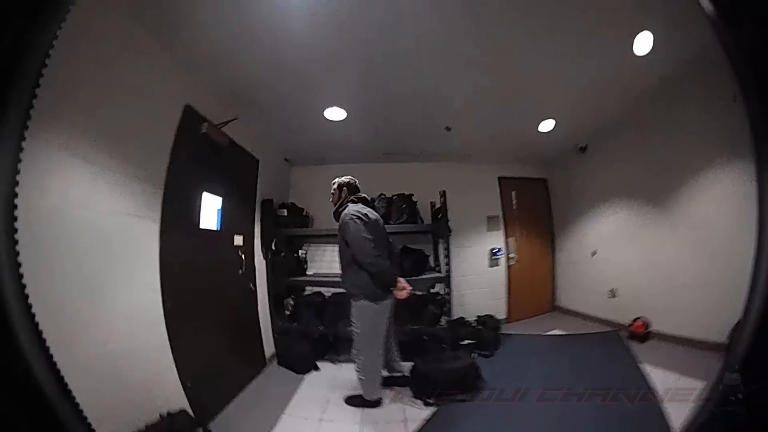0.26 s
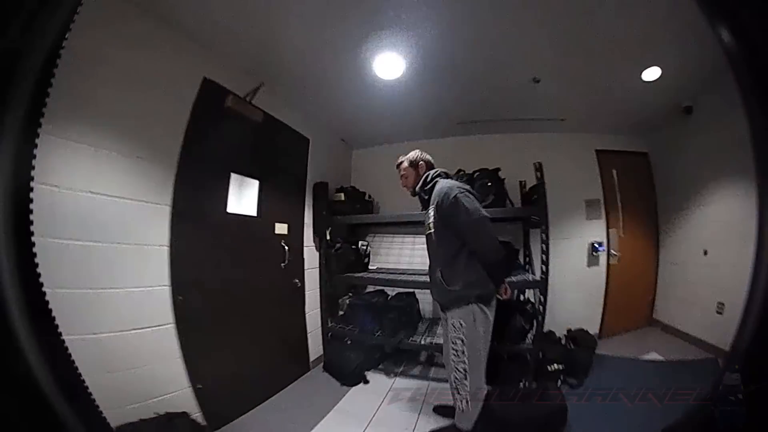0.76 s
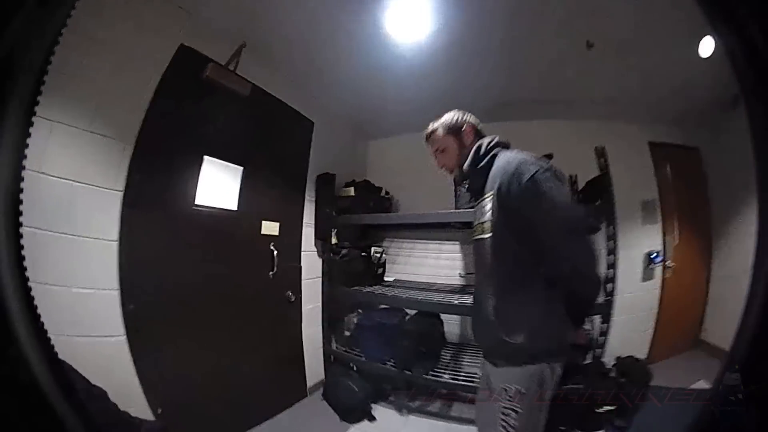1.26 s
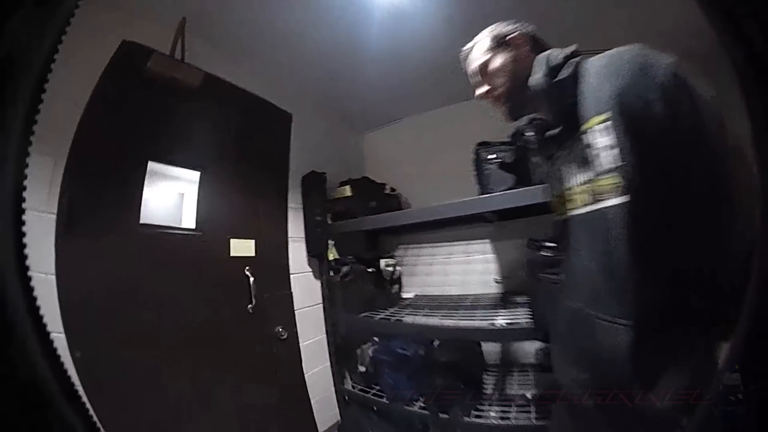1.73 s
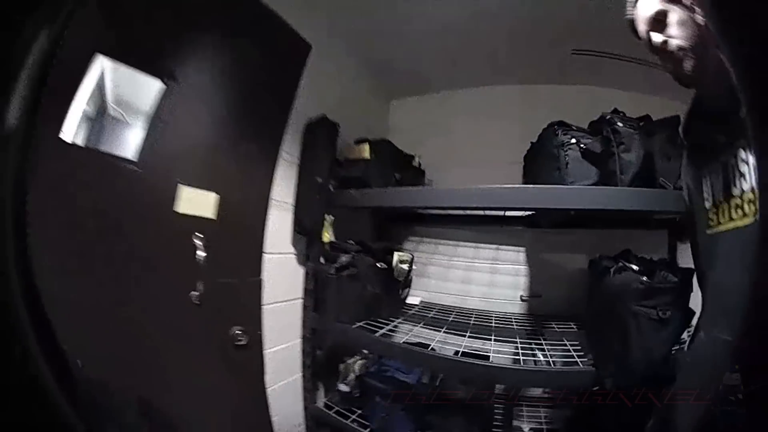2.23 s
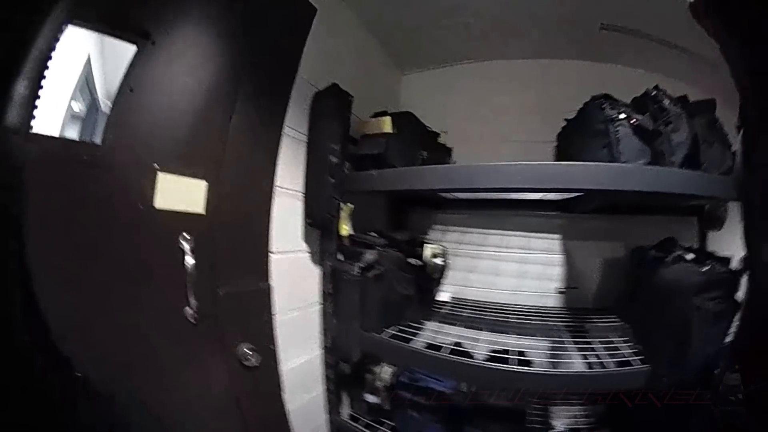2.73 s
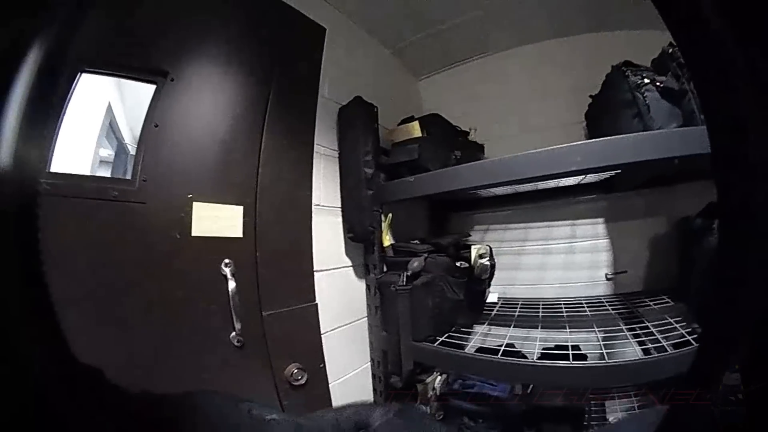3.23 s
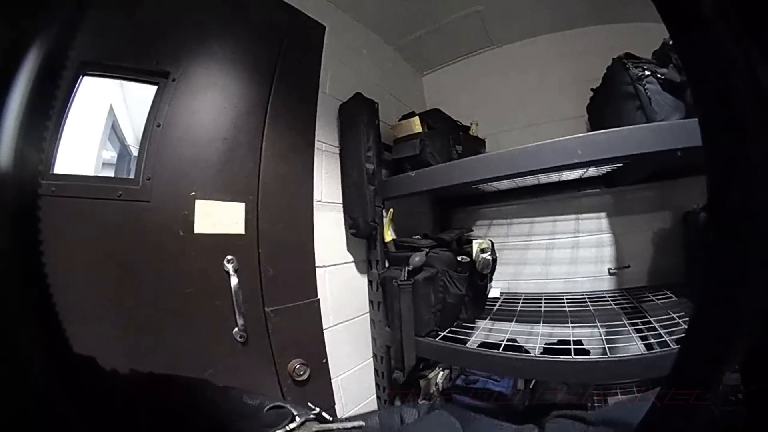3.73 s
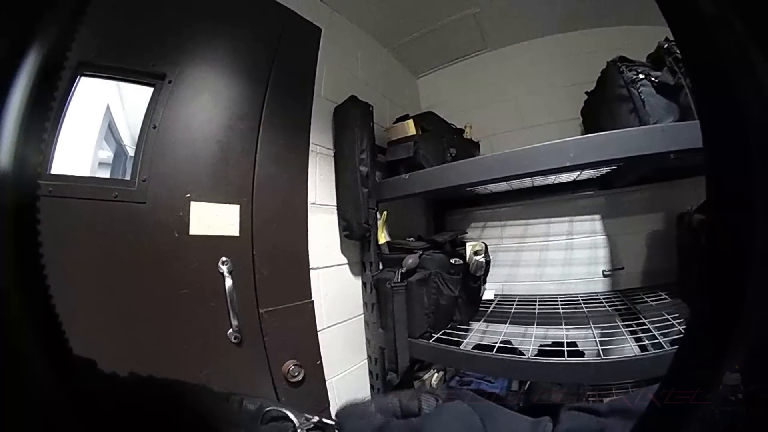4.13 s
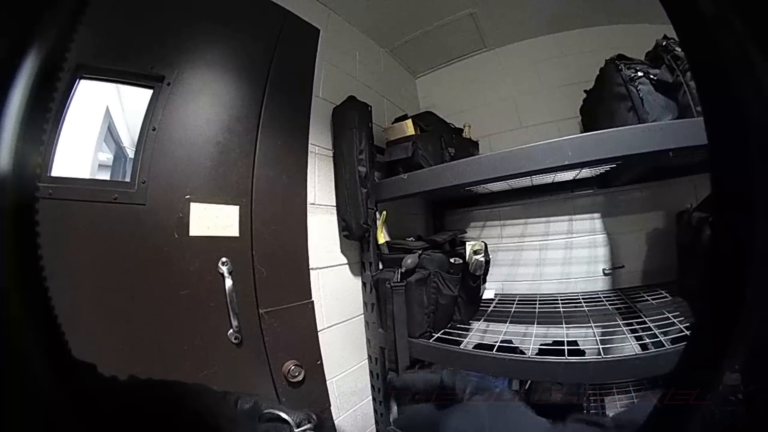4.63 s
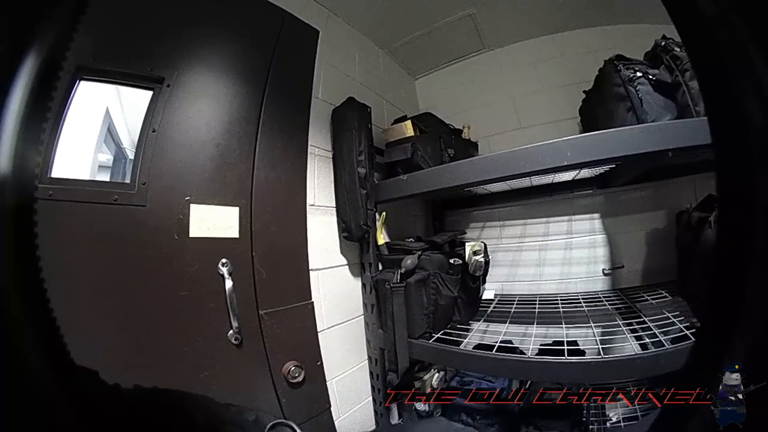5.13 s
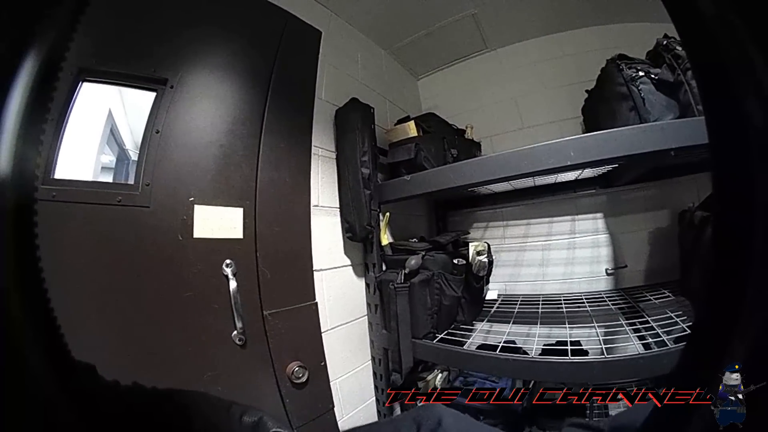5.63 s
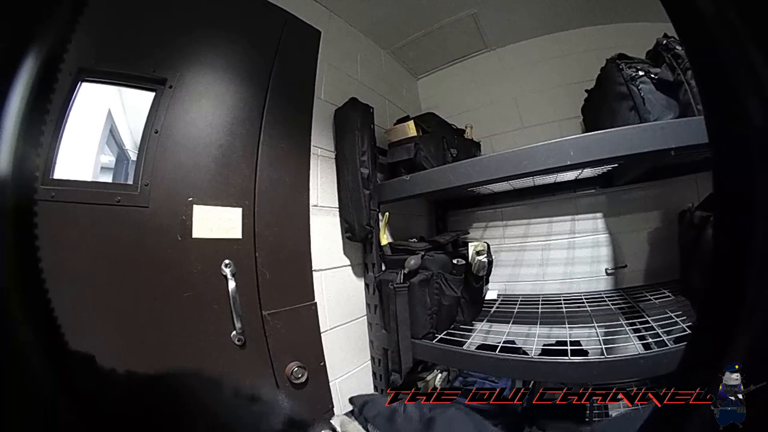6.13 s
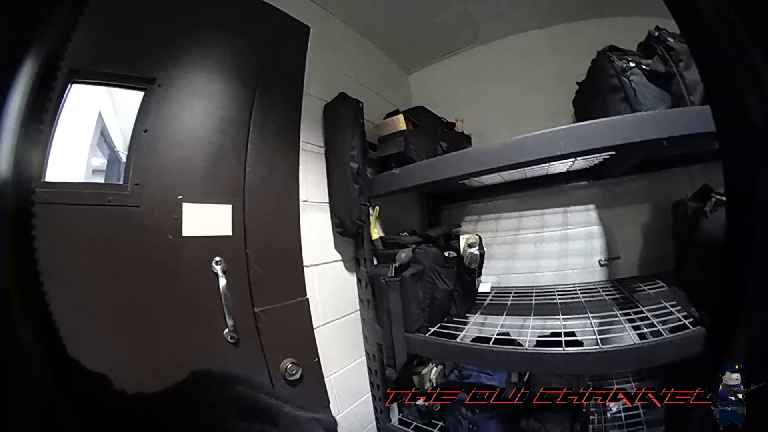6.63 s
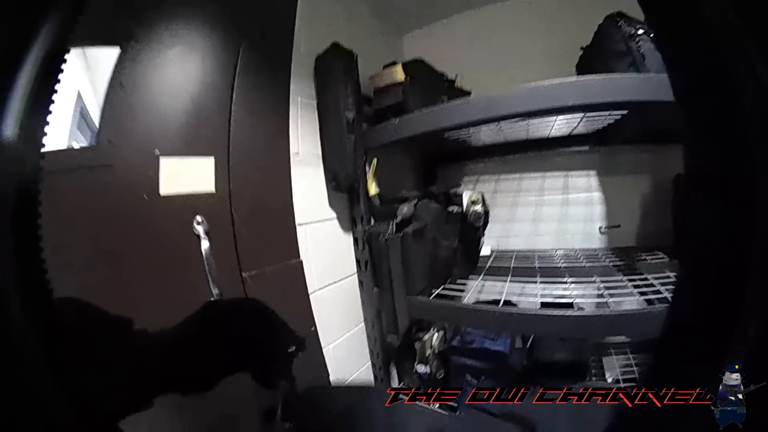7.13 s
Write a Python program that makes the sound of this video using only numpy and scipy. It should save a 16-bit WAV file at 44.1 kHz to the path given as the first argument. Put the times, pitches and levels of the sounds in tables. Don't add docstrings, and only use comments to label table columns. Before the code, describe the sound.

In a small block-walled room with faint ventilation hum, someone wearing a chest microphone walks up with loud cloth rustle and a dull bump. A hard metallic clank hits a door lock, keys click rapidly as they are sorted in the hand, go sparse and quiet, then jingle brightly when shaken. A soft thud on the door ends it.

```python
import sys
import numpy as np
from scipy import signal
from scipy.fft import rfft, irfft
from scipy.io import wavfile
from scipy.ndimage import uniform_filter1d, minimum_filter1d

SR = 44100
rng = np.random.default_rng(int(sys.argv[2]) if len(sys.argv) > 2 else 0)


def natural_amplitude(level_db):
    exponent = np.asarray(level_db, float) / 20
    return 10 ** exponent


def to_wav(s):
    ch = np.atleast_2d(s).T
    pcm = np.round(np.clip(ch, -1, 1) * 32767)
    wavfile.write(sys.argv[1], SR, pcm.astype(np.int16))


N = 325017

# f/Hz, spectral level/dB
AIR = [(29, -40), (50, 14.5), (81, -9), (145, 0), (380, -23.5), (729, -39), (863, -44), (3850, -43),
       (5150, -37), (6550, -43), (10400, -17), (14500, -19.5), (16000, -32)]
# f/Hz, rms level/dB
HUM = [(120, -64), (180, -70)]

# t/s, level/dB
SWAY = [(0, -42), (.3, -38.5), (.8, -41), (1.1, -18), (1.5, -34.5), (2.0, -40.5), (2.8, -41.5),
        (3.15, -33.5), (3.4, -42.5), (4.4, -46.5), (6.0, -49), (6.4, -43), (6.7, -48.5), (7.37, -41)]
# f/Hz, spectral level/dB
RUMBLE = [(8, -5.5), (20, -11), (40, -23.5), (70, -30), (100, -57)]
RUB = [(60, -10), (90, -5), (200, -5.5), (400, -4), (700, -11), (1100, -15), (1500, -33)]
SHIFT = [(41, -33), (70, -4.5), (151, -1.5), (258, -5.5), (900, -13.5), (1170, -73), (1980, -120)]
RUSTLE = [(410, -9.5), (700, -4.5), (1330, -1), (1590, -4.5), (1960, -4), (3300, -8.5), (4290, -23),
          (7260, -120)]
SWISH = [(1590, -13.5), (2700, -10), (4380, -1), (4790, 1), (8890, -9.5), (10400, -7), (11600, -18.5),
         (14300, -16), (15600, -34), (16000, -51)]
# t/s, level/dB, brightness/dB, 10 dB rise/s, 10 dB fall/s
STROKES = [(.235, -39.5, -4.5, 0.05, 0.13), (.1, -53.5, 1.5, 2, 0.34), (0.301, -46, 5.5, .04, 0.05),
           (.78, -51, 12, 0.3, .3), (.838, -37.5, 2.5, .008, 0.0854), (0.914, -31, 0, 0.05, 0.0957),
           (1.005, -24, 3.5, 0.0219, 0.0542), (1.08, -29.5, -1.5, 0.0534, 0.1477),
           (1.185, -27.5, -5.5, 0.03, .08), (1.25, -42, 3, .05, .14), (.25, -50, 8, .02, .08),
           (1.41, -40.5, -24, 0.2, 0.1), (1.581, -56, 10.5, 0.04, 0.22), (1.68, -46, 3.5, 0.05, 0.11),
           (2.05, -47.5, -4.5, 0.22, 0.3), (2.64, -44.5, 6.5, 0.07, 0.38), (3.15, -47, 2.5, 0.6, 0.44),
           (4.0, -57.5, 2.5, 0.6, 0.35), (4.55, -56, -0.5, 0.02, 0.06), (4.7, -56, 5, 0.03, 0.11),
           (4.77, -57, 5.5, 0.06, 0.07), (4.979, -54, 5.5, 0.0663, 0.06), (5.18, -57, 3, 0.07, 0),
           (5.42, -58, 3.5, 0.07, 0.14), (6.45, -53, 3.5, 0.59, 0.06), (7.05, -48, 2, 0.31, 1),
           (7.37, -38, -8, 0.15, .1)]
# t/s, drop of the cloth/dB, half width/s
LULLS = [
    (2.23, 3, .03),
    (2.48, 3, 0.028),
    (3.46, 2, .1),
    (4.3, 0.8, .1),
    (4.62, 4.5, 0.033),
    (5.11, 3, .03),
    (5.26, 6, 0.042),
    (5.6, 3.5, .08),
    (6.07, 4, .03),
    (6.8, 4, .05),
]
# t/s, height, half width/s
PRESSES = [
    (.93, .1, .03),
    (1.044, 0.32, 0.011),
    (1.105, -0.29, .021),
    (1.198, 0.46, .012),
    (1.283, 0.21, .017),
]

# t/s, thud/dB, clank/dB, crack/dB, tail t60/s
BLOWS = [
    (0.229, -20.5, -26, -60, 0.81),
    (1.385, -30.5, -35, -48, 0.46),
    (2.275, -48, -29, -43.5, 0.059),
    (2.588, -31, -9, -18.5, 0.34),
    (2.615, -27.5, -24, -18.5, 0.14),
    (2.741, -45, -27, -36, 0.69),
    (2.776, -29.5, -19, -20, 0.24),
    (6.859, -33, -29, -40, 0.022),
    (7.289, -20, -26.5, -38, 0.12),
    (7.338, -41, -49, -42.5, 0.27),
]
# f/Hz, bandwidth/Hz, level/dB
THUD = [(193, 37, -10), (296, 54, 3.5), (457, 122, 4), (640, 170, -3.5)]
CLANK = [(530, 170, -7), (848, 86, 1.5), (1110, 260, 1), (1730, 390, -2), (2264, 170, -2.5),
         (2740, 240, -2.5)]
CRACK = [(3300, 840, 5.9), (5300, 1320, 12.5), (7140, 3800, 11.8), (10550, 6000, 10.5), (13740, 1200, 11)]
BOOM_S = (.88, 1)
# f/Hz, level/dB, t60/s
ROOM_MODES = [(95.7, -24, 0.86), (190.6, -21, 0.18), (382, -16.5, 0.15), (565, -38, 0.092)]
# t/s, level/dB
RAPS = [
    (2.2756, -24),
    (2.589, -24),
    (7.291, -32),
]
# f/Hz, level/dB, t60/s
LEAF = [
    [(1420, -2.5, 0.027), (1610, -2.5, 0.027), (1110, -9, .015)],
    [(877, -7, 0.32), (1140, -3, .2), (1270, 2.5, .07), (571, -11, 0.15), (2331, -9, .15), (2770, 0, 0.055)],
    [(1650, 0, .04), (1100, -5, .03)],
]

# f/Hz, level/dB, t60/s
HELD = [(1560, -14, 0.023), (2270, -9.5, 0.029), (3080, -17, 0.01), (3920, -6.5, 0.05), (4700, -7.5, 0.033),
        (5250, -2, 0.06), (5680, -5, 0.016), (5930, -11, 0.0098), (7280, -1.5, 0.03), (7950, -4.5, 0.043),
        (9200, -7.5, 0.022), (9970, -6, 0.065), (10820, 0.5, 0.039), (12800, -8, 0.018),
        (13700, -12.5, 0.0088)]
# t/s, peak
# level/dB, f/Hz
TAPS = [(3.2414, -33, 5130), (3.2484, -31, 4450), (3.2675, -28, 5350), (3.3009, -31, 5130),
        (3.3174, -33, 5050), (3.5024, -31, 7950), (3.5454, -29.5, 8730), (3.5644, -33, 7910),
        (4.578, -33, 8500), (4.634, -40, 6000), (4.684, -38, 7500), (7.0254, -28, 7500),
        (7.0824, -33, 11100), (7.1324, -32, 6960), (7.2235, -20, 6000),
        (1.646, -21, 10000), (1.6916, -17.5, 10100), (3.0527, -24, 6300), (3.1692, -20, 9000),
        (2.7466, -13, 4700), (3.0584, -14.5, 7500), (3.0445, -16, 2900), (3.087, -15, 3900),
        (3.1267, -4.5, 10370), (3.157, -4, 6520), (3.353, -24, 5250), (3.4895, -32, 5680),
        (3.534, -28, 5000), (3.5745, -23, 7400), (3.5879, -6, 7050), (3.5976, -2.5, 5600),
        (3.7325, -25, 7710), (3.7623, -27, 5100), (3.7765, -19, 4640), (3.7953, -16.5, 11600),
        (3.9303, -28.5, 5930), (3.9415, -18, 7340), (4.0183, -32.5, 7020), (4.1045, -27, 4540),
        (4.1238, -23, 4420), (4.5313, -20, 7300), (4.5589, -23.5, 12800), (4.757, -8.5, 7540),
        (5.075, -17, 7700), (5.094, -22.5, 4480), (5.1553, -30, 5300),
        (5.7167, -35, 4900), (5.8489, -21, 7500), (5.866, -23, 11400), (5.877, -11, 6820),
         (5.9241, -30.5, 3540), (5.997, -34, 3300), (6.0267, -33, 5570), (6.098, -17.5, 12500),
         (6.1983, -10.5, 7500), (6.22, -19, 10420), (6.242, -15, 5700), (6.3, -8, 10400), (6.31, -18, 3920),
         (6.319, -16, 11020), (6.3453, -24.5, 3920), (6.3811, -14.5, 4200), (6.3936, -29, 5250),
         (6.5153, -13.5, 7150), (6.6509, -16.5, 6400), (6.7051, -26.5, 7200), (6.7428, -22, 13000),
         (6.865, -21, 5640), (6.926, -24, 4000), (6.9567, -12.5, 11000), (7.05, -11, 11300),
         (7.1152, -17.5, 7840), (7.1636, -34, 3920), (7.2271, -18, 4220), (7.2868, -23, 7470),
         (7.306, -22, 7400)]
# t/s, peak level/dB, f/Hz, delay of rebound/s
DOUBLES = [(1.574, -22.5, 5300, 0.0036), (2.5343, -25, 3400, 0.0064), (2.7812, -6, 5300, 0.0055),
           (2.999, -15.5, 10600, .0037), (3.099, -20, 10000, .003), (3.0693, -9, 3950, 0.005),
           (3.143, -8, 10700, .003), (3.371, -17.5, 8500, 0.0042), (3.4201, -18, 9500, 0.0085),
           (3.463, -23, 5600, 0.0084), (3.6891, -26, 5040, .0052), (3.702, -15, 7260, 0.0058),
           (5.795, -16.5, 8470, 0.0071), (6.1297, -10, 7000, 0.0032), (6.1409, -14, 10900, 0.0098),
           (6.187, -12, 13050, .0074), (6.2635, -6.5, 11100, 0.009), (6.4222, -14.5, 11040, 0.0057),
           (6.455, -28, 5210, .0087), (6.88, -11.5, 12660, 0.0083), (6.939, -21, 5430, 0.0036),
           (7.1735, -18, 5400, .005), (7.1841, -28, 4910, .0043)]
# start t/s, end t/s, level/dB, fade/dB,
# f/Hz
SLIDES = [(2.349, 2.384, -42, 4, 4500), (2.424, 2.44, -46, 3, 6500), (2.53, 2.59, -45.5, 1, 3000),
          (2.741, 2.775, -36, 4, 4000), (2.773, 2.782, -27, -6, 6500), (2.781, 2.8, -22, 10, 7500),
          (2.977, 2.993, -44, 3, 9000), (2.998, 3.02, -40, 6, 10000), (3.051, 3.064, -31, 5, 7000),
          (3.067, 3.084, -24, 4, 9000), (3.085, 3.097, -29, 6, 6000), (3.095, 3.104, -31, 3, 10000),
          (3.106, 3.125, -29.5, 3, 7000), (3.126, 3.139, -22, 6, 9500), (3.143, 3.156, -21.5, 3, 11000),
          (3.157, 3.169, -26, 8, 8000), (3.33, 3.58, -53, 1, 12500), (3.69, 3.81, -52, 1, 12500),
          (7.1, 7.365, -49, 1, 12500), (5.791, 5.89, -40.5, 5.5, 8000), (6.097, 6.124, -41, 8, 8000),
          (6.129, 6.172, -29, 7, 3500), (6.185, 6.206, -29, 4, 9000), (6.204, 6.237, -37, 3, 6000),
          (6.277, 6.298, -44, 5, 6000), (6.242, 6.278, -32, 1, 8000), (6.3, 6.315, -26.5, 2, 8000),
          (6.319, 6.33, -32, 5.5, 8000), (6.378, 6.41, -35, 4, 8000), (6.419, 6.44, -34, 6, 8000),
          (6.454, 6.469, -40, 2, 6500), (6.876, 6.9, -30, 7, 8000), (6.911, 6.933, -36.5, 0, 8000),
          (6.936, 6.98, -30.5, 6.5, 4500), (6.978, 7.045, -44, 1, 8000), (7.048, 7.095, -43, 6, 8000),
          (7.163, 7.198, -35.5, 1, 6000), (7.223, 7.24, -37, 4, 6000)]
# f/Hz, level/dB, t60/s
KEYS = [
    [(11020, 0, .25), (7070, -11, .15), (12330, -14, .15)],
    [(5580, 0, .45)],
    [(3920, 0, .08)],
    [(5265, 0, .3)],
    [(1420, 0, .05), (1960, -2, .04), (2330, 0, .06), (3020, -3, .03)],
]
# t/s, level/dB, delay until caught/s
RINGS = [
    [(6.098, -33, 0.027), (6.13, -44, .03), (6.15, -24, 0.034), (6.879, -36, 0.006), (6.889, -32, .018),
     (6.937, -26, 0.052), (6.655, -43, 0.036), (7.05, -43, .02), (7.185, -43, .035)],
    [(6.242, -20, 0.022), (6.264, -40, 0.035), (6.42, -45, .03), (6.325, -46, .055), (6.384, -47, 0.048),
     (6.465, -48, .05)],
    [(3.6, -40, .05), (3.702, -30, 0.0096), (4.758, -37, 0.0065), (6.146, -26, 0.008), (6.157, -34, .01),
     (6.176, -30, 0.012), (6.198, -35, .006), (6.31, -31, .008), (6.346, -37, .02), (6.381, -37, .02),
     (6.112, -45.5, .015), (6.892, -41.5, .04), (4.533, -41, .006), (5.078, -43, .006),
     (6.44, -33.5, 0.006), (7.225, -35, 0.011)],
    [(3.942, -44, 0.026), (4.045, -49, .1), (2.79, -42, .12)],
    [(3.598, -41, .02), (3.702, -41.5, .03), (6.13, -37, 0.013), (6.142, -38.5, .03), (6.94, -43, .03),
     (6.31, -44, 0.022)],
]


def rms_one(x):
    return x / np.sqrt(np.mean(x ** 2) + 1e-20)


def drift(rate):
    r = np.exp(-80 * np.pi * rate / SR)
    slow = signal.lfilter([1], [1, -2 * r, r * r], rng.standard_normal(N // 40 + 2002))[2000:]
    return np.interp(np.arange(N) / 40, np.arange(len(slow)), rms_one(slow))


def coloured(spectrum, source):
    hz, db = np.transpose(spectrum)
    grid = np.maximum(np.arange(N // 2 + 1) * SR / N, 1)
    gain = natural_amplitude(np.interp(np.log(grid), np.log(hz), db, left=-90, right=-90))
    return rms_one(irfft(rfft(source) * gain, N))


def resonances(x, peaks):
    out = 0
    for k, (hz, width, db) in enumerate(peaks):
        r = np.exp(-np.pi * width / SR)
        poles = [1, -2 * r * np.cos(2 * np.pi * hz / SR), r * r]
        out = out + (-1) ** k * natural_amplitude(db) * signal.lfilter([1 - r * r, 0, r * r - 1], poles, x) / 2
    return out


def struck(modes, length_s):
    hz, db, t60 = np.transpose(modes)[:, :, None]
    t = np.arange(int(length_s * SR)) / SR
    return np.sum(natural_amplitude(db - 60 * t / t60) * np.sin(2 * np.pi * hz * t), axis=0)


def add(out, s, sound):
    i = round(s * SR)
    out[i:i + len(sound)] += sound[:N - i]


def ventilation():
    t = np.arange(N) / SR
    hum = sum(natural_amplitude(db + 6 + 1.6 * drift(2.3)) * np.sin(2 * np.pi * hz * t) for hz, db in HUM)
    return natural_amplitude(-55.5) * coloured(AIR, rng.standard_normal(N)) + hum


def fibres(grain_db, flicker_db):
    sizes = natural_amplitude(grain_db * np.minimum(rng.exponential(1, N), 6))
    return rng.standard_normal(N) * sizes * natural_amplitude(flicker_db * drift(17.2))


def strokes(t, sway_db):
    calm_db = np.array([-58.5, -64.5, -60.5])[:, None]
    lull_db = sum(db * np.exp(-.5 * ((t - s) / width) ** 2) for s, db, width in LULLS)
    power = natural_amplitude(2 * (calm_db + 0.39 * (sway_db + 45) - lull_db))
    for s, db, bright_db, rise, fall in STROKES:
        jerk_db = 3 * max(np.log2(0.056 / rise), 0)
        rustle_db = -3.5 + 0.63 * bright_db + jerk_db
        for layer, lift_db, linger in zip(power, (0, rustle_db, bright_db), (1.1, 0.89, 0.82)):
            shape = np.maximum((s - t) / rise, (t - s) / (fall * linger))
            layer += natural_amplitude(2 * (db + lift_db - 10 * shape))
    return np.sqrt(power)


def wearer():
    arrive_s = 1.56
    t = np.arange(N) / SR
    sway_db = np.interp(t, *np.transpose(SWAY))
    coarse = t[::32]
    gains = [np.interp(t, coarse, g) for g in strokes(coarse, sway_db[::32])]
    rub_gain, rustle_gain, swish_gain = gains
    out = natural_amplitude(sway_db) * coloured(RUMBLE, rng.standard_normal(N))
    rub = fibres(grain_db=0.87, flicker_db=1.4)
    out += rub_gain * np.where(t < arrive_s, coloured(RUB, rub), coloured(SHIFT, rub))
    cloth = fibres(grain_db=1.5, flicker_db=1.5)
    out += rustle_gain * coloured(RUSTLE, cloth) + swish_gain * coloured(SWISH, cloth)
    for s, height, width in PRESSES:
        out += height * (s - t) / width * np.exp(.5 - .5 * ((t - s) / width) ** 2)
    return out


def door():
    out, t = np.zeros(N), np.arange(SR // 2) / SR
    noises = rng.standard_normal((len(BLOWS), SR // 2))
    for (s, thud_db, clank_db, crack_db, t60), noise in zip(BLOWS, noises):
        slides_home = crack_db > clank_db + 4
        rise = np.minimum(t / (.008 if slides_home else .0003), 1) ** 2
        rattle = noise * rise * natural_amplitude(-60 * t / t60) * (1 + 1.5 * natural_amplitude(-60 * t / 0.034))
        if not slides_home:
            rattle[8] += 3.4
        thud = natural_amplitude(thud_db + 16) * resonances(rattle, THUD)
        clank = natural_amplitude(clank_db + 11) * resonances(rattle, CLANK)
        crack = natural_amplitude(crack_db) * resonances(rattle, CRACK)
        add(out, s, natural_amplitude(-13) * (thud + clank + crack))
    return out


def room(x):
    t60_s, level_db = 0.52, -19.5
    t = np.arange(SR // 2) / SR
    bright, dull = rng.standard_normal((2, SR // 2))
    dull = signal.lfilter([.4], [1, -.6], dull)
    tail = bright * natural_amplitude(-60 * t / (0.17 * t60_s)) + dull * natural_amplitude(-60 * t / t60_s)
    tail *= t > .004
    return natural_amplitude(level_db) * signal.fftconvolve(x, tail / np.sqrt(np.sum(tail ** 2)))[:N]


def boom():
    out, t = np.zeros(N), np.arange(SR // 2) / SR
    for s in BOOM_S:
        add(out, s, struck(ROOM_MODES, len(t) / SR) * np.minimum(t / 0.035, 1))
    return out


def in_palm(s):
    return 3.2 < s < 5.5


def contacts():
    rows = [*TAPS, *[row[:3] for row in DOUBLES]]
    for (s, db, hz, gap), turn in zip(DOUBLES, rng.standard_normal(len(DOUBLES))):
        rows.append((s + gap, db - 3, np.clip(hz * 2 ** (0.29 * turn), 3000, 13000)))
    out = []
    for (s, db, hz), luck in zip(rows, rng.standard_normal(len(rows))):
        edge_db = -4 + 3.5 * np.log2(hz / 6000)
        out.append((s, db, hz, edge_db - 4 * in_palm(s) + 3 * luck))
    return out


def ticks(held_db=-9, spread_db=3.5, scatter_db=-15, scatter_t60=0.022, detune=0.0325):
    out, rows, size = np.zeros(N), contacts(), 1200
    hz, held, t60 = np.transpose(HELD)
    chance = rng.standard_normal((len(rows), 2, len(HELD)))
    hiss = rng.standard_normal((len(rows), size))
    hiss[:, 10] += 7
    t = np.arange(size) / SR
    for (s, db, pitch, bright_db), (luck, shift), noise in zip(rows, chance, hiss):
        colour = np.where(hz > 9000, np.minimum(bright_db, 0), np.minimum(-bright_db, 0))
        near = -6.5 * np.abs(np.log2(hz / pitch))
        grip = .6 * (.55 if in_palm(s) else 1)
        modes = np.transpose([hz * (1 + detune * shift), held + colour + near + spread_db * luck, grip * t60])
        snap = struck([(pitch, 3, .006), (pitch, -16, .025)], size / SR)
        crack = [(f, width, g + (bright_db if f > 9000 else 0)) for f, width, g in CRACK]
        sound = snap + natural_amplitude(held_db) * struck(modes, size / SR)
        sound += natural_amplitude(scatter_db - 60 * t / scatter_t60) * resonances(noise, crack)
        sound[8:12] += 1.77 * np.array([1, 0.75, -0.66, -0.89]) * np.sign(noise[0])
        sound = signal.sosfilt(signal.butter(2, min(1.9 * pitch, 19000), fs=SR, output="sos"), sound)
        sound /= np.abs(sound).max()
        add(out, s, natural_amplitude(db) * sound * np.minimum(t / 0.00026, 1))
    return signal.sosfilt(signal.butter(2, 1400, "high", fs=SR, output="sos"), out)


def raps():
    out = np.zeros(N)
    for (s, db), modes in zip(RAPS, LEAF):
        add(out, s, natural_amplitude(db) * struck(modes, N / SR / 20))
    return out


def slides(per_s=2800, grain_db=3, focus_db=3):
    sizes = natural_amplitude(grain_db * np.minimum(rng.exponential(1, N), 3))
    grains = (rng.random(N) < per_s / SR) * rng.choice([-1, 1], N) * sizes
    dealt = rng.integers(0, len(HELD), N)
    rings = []
    for k, (hz, db, t60) in enumerate(HELD):
        own = grains * (dealt == k) + 1e-18
        rings.append(resonances(own, [(hz, 9.4 / t60, db)]))
    rings = np.array(rings)
    out = np.zeros(N)
    for start, end, db, fade_db, pitch in SLIDES:
        t = np.arange(int((end - start) * SR)) / SR
        near = natural_amplitude(-focus_db * np.abs(np.log2(np.transpose(HELD)[0] / pitch)))
        sound = rms_one(near @ rings[:, int(start * SR):][:, :len(t)])
        edges = np.clip(np.minimum(t / .0006, (t[-1] - t) / 0.0015), 0, 1)
        add(out, start, natural_amplitude(db - fade_db * t / t[-1]) * edges * sound)
    return out * natural_amplitude(2.5 * drift(67))


def free_keys(catch_s=0.0038):
    out, t = np.zeros(N), np.arange(int(.15 * SR)) / SR
    for modes, strikes in zip(KEYS, RINGS):
        for s, db, caught in strikes:
            add(out, s, natural_amplitude(db) * struck(modes, .15) * np.exp(-np.maximum(t - caught, 0) / catch_s))
    return out


def dipped(bed, keys, depth_db=7, knee_db=-24, treble_depth_db=15, treble_knee_db=-31, ahead=260):
    size = np.abs(keys)
    loud = -minimum_filter1d(-size, size=700)
    next_peak = np.roll(-minimum_filter1d(-size, size=300), -ahead)
    coming = np.maximum(next_peak - 2 * uniform_filter1d(size, size=300), 0)
    share = uniform_filter1d(loud / (loud + natural_amplitude(knee_db)), size=120)
    soon = uniform_filter1d(coming / (coming + natural_amplitude(treble_knee_db)), size=120)
    bass = signal.sosfiltfilt(signal.butter(2, 500, fs=SR, output="sos"), bed)
    treble = signal.sosfiltfilt(signal.butter(3, 7500, "high", fs=SR, output="sos"), bed)
    middle = bed - bass - treble
    return bass + natural_amplitude(-depth_db * share) * (middle + natural_amplitude(-treble_depth_db * soon) * treble)


def scene():
    keys = ticks() + slides() + free_keys()
    metal = keys + door() + raps()
    background = dipped(wearer() + ventilation(), keys)
    return (metal + room(metal) + boom() + background)[None]


def top_cut(x):
    return signal.sosfilt(signal.butter(12, 16490, fs=SR, output="sos"), x)


def record(dry):
    rounded = .8 * np.tanh(dry / 0.82)
    mix = signal.sosfilt(signal.cheby2(10, 50, 16600, fs=SR, output="sos"), rounded)
    return top_cut(mix)


dry = scene()
out = record(dry)
to_wav(out)
```